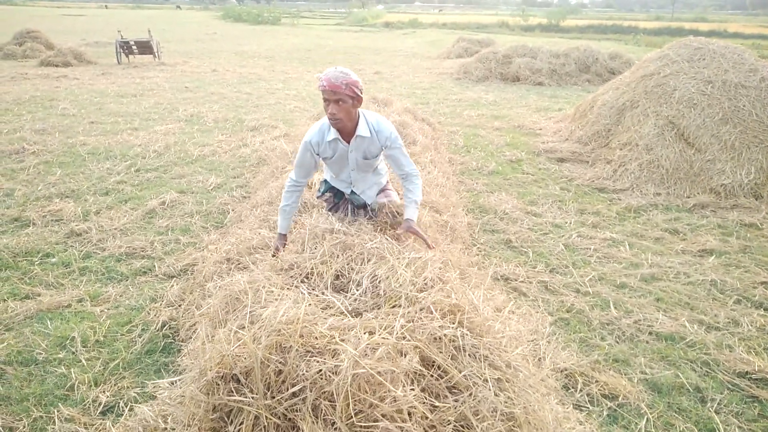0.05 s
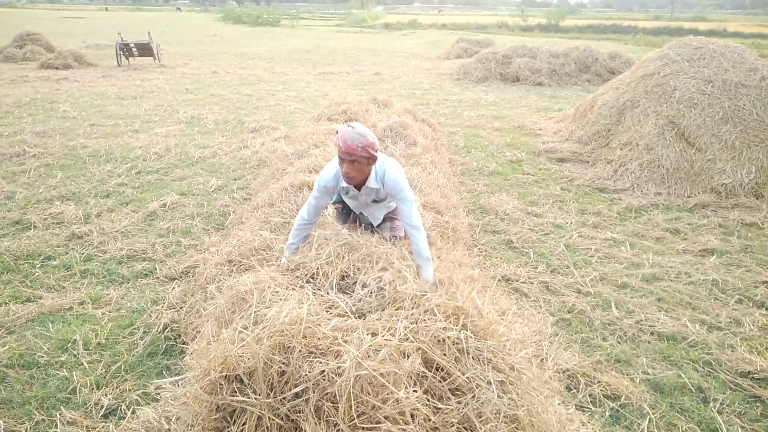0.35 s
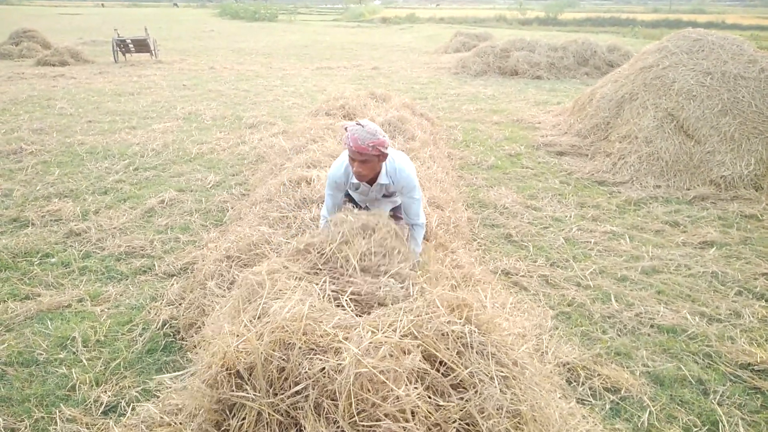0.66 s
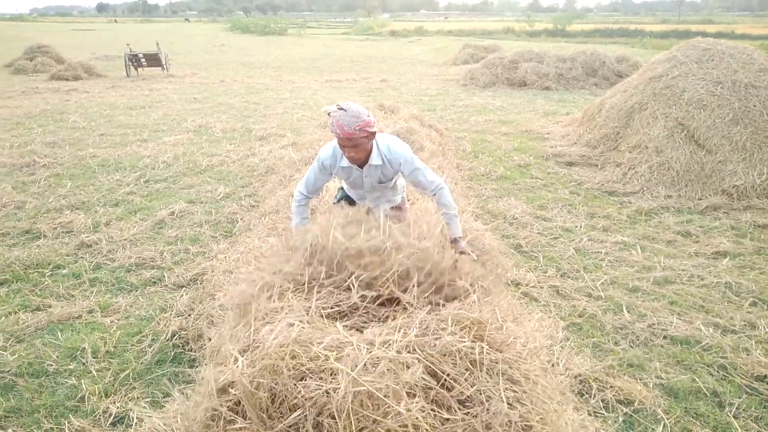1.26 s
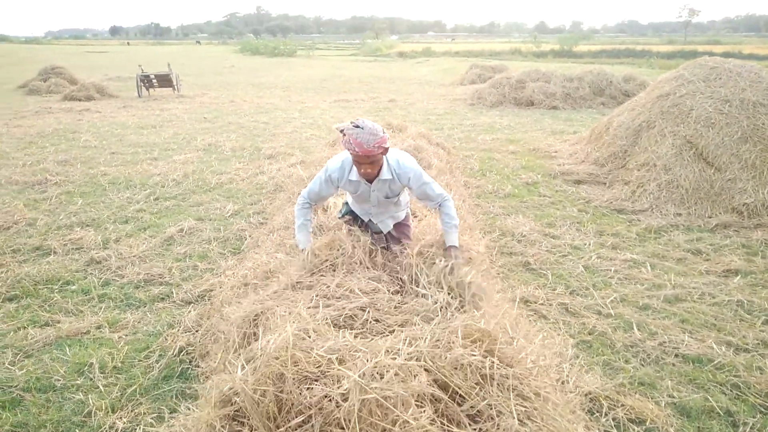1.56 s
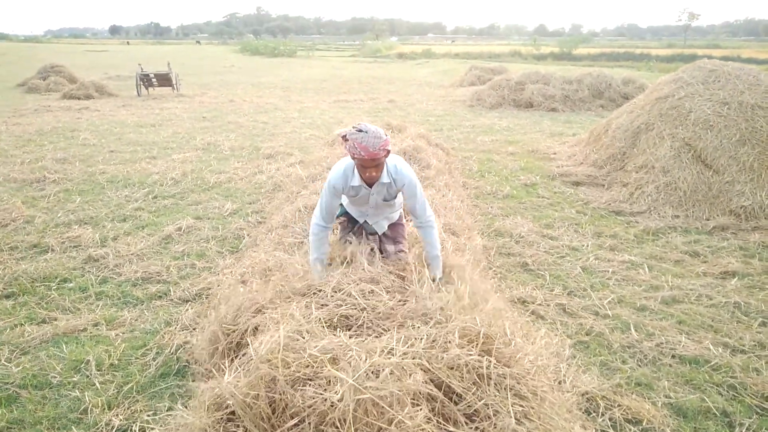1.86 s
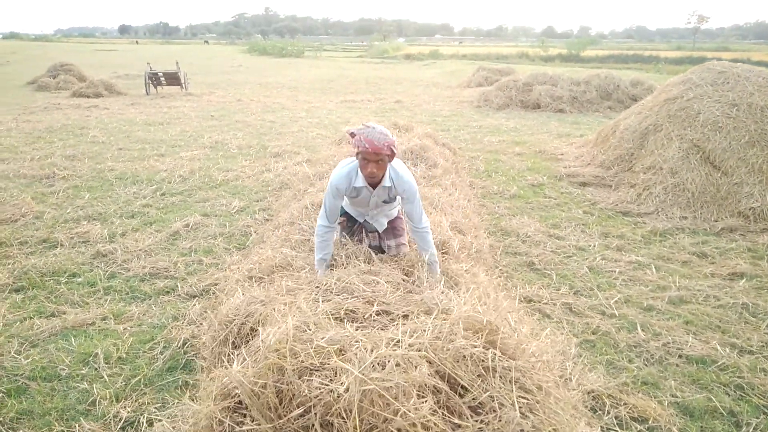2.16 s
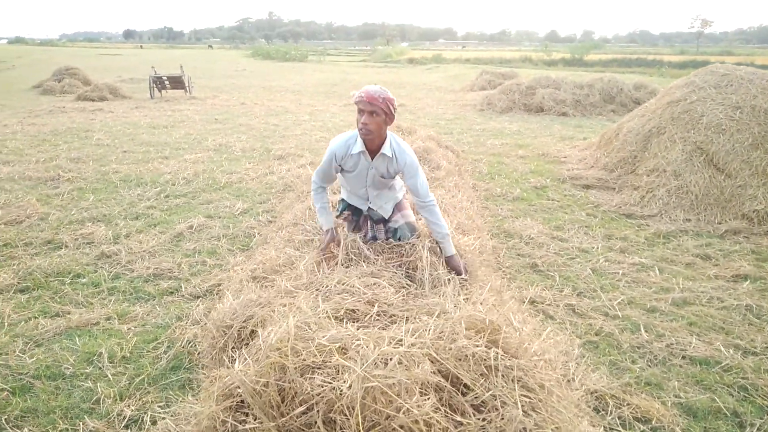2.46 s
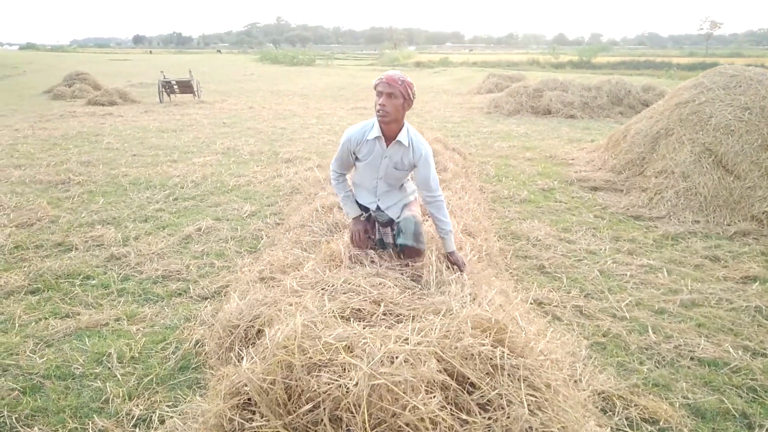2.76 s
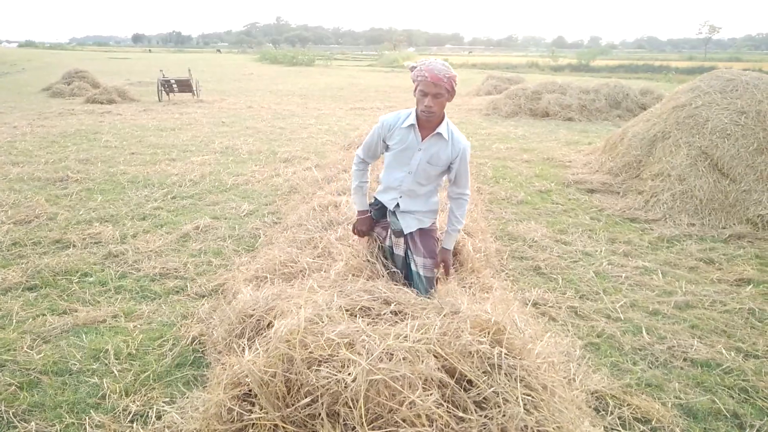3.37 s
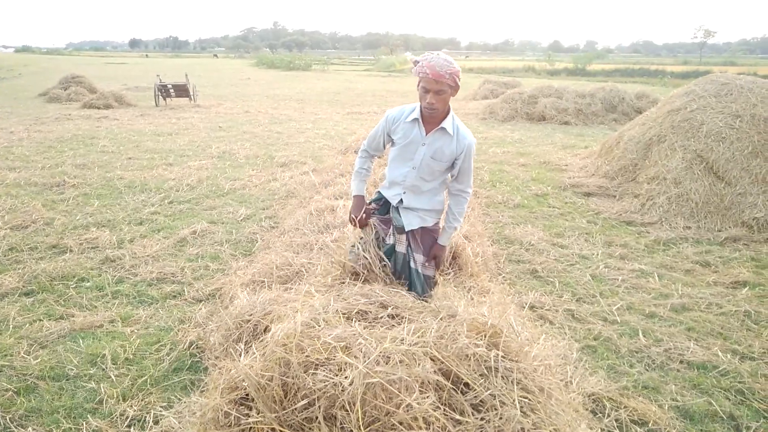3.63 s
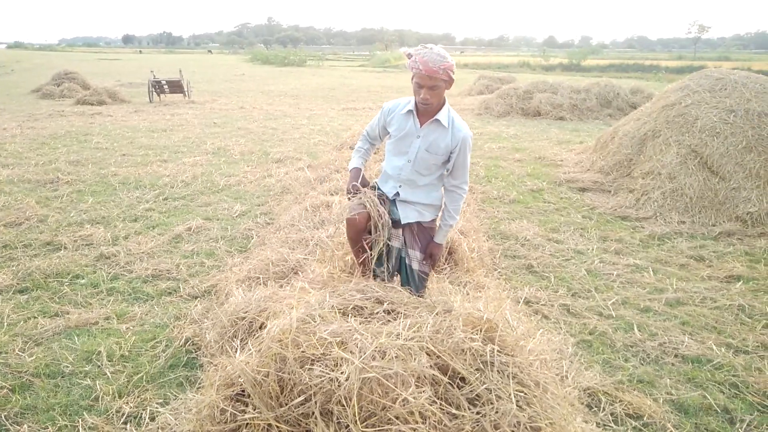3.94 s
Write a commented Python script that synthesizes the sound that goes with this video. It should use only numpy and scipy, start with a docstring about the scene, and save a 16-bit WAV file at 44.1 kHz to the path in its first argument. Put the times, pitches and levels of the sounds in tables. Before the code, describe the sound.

Armfuls of dry straw hiss and crackle under low gusts of wind on the microphone.

```python
"""Piling straw in the wind

Armfuls of dry straw are gathered, lifted and pressed onto a pile in an open field, a few metres
from a phone. Countless snapping stalks merge into a soft hiss over the duller rub of the bundle.
Gusts carry eddies past the microphone and buffet it, mostly its right port.
Early on something hard knocks close by; near the end a far bird peeps. There is no echo."""
import sys
import numpy as np
from scipy import signal
from scipy.fft import rfft, irfft
from scipy.io import wavfile
from scipy.ndimage import uniform_filter1d, map_coordinates

SR = 44100
rng = np.random.default_rng(int(sys.argv[2]) if len(sys.argv) > 2 else 0)


def wav_out(sig):
    """Save sig, one row per channel (or a flat mono array), as 16-bit PCM at SR to the path in sys.argv[1]."""
    wavfile.write(sys.argv[1], SR, np.round(np.clip(np.atleast_2d(sig).T, -1, 1) * 32767).astype(np.int16))


N = 176400


def undb(db):
    """Decibels to gain."""
    return 10 ** (np.asarray(db) / 20)


def unit_rms(x):
    """Scale to rms 1."""
    return x / np.sqrt(np.mean(x ** 2))


def colour(x, curve):
    """Zero-phase filter; curve rows: f/Hz, gain/dB."""
    hz, db = np.array(curve, float).T
    bins_hz = np.maximum(np.arange(N + 1) * SR / (2 * N), 1)
    gain = undb(np.interp(np.log(bins_hz), np.log(np.sort(hz)), db))
    return irfft(rfft(x, 2 * N) * gain)[..., :N]


def drift(rate_hz):
    """Smooth random drift, rms 1."""
    hold = max(int(SR / rate_hz), 2)
    steps = np.repeat(rng.standard_normal(N)[:N // hold + 1], hold)
    return unit_rms(uniform_filter1d(steps, hold)[:N])


def pan(left_minus_right_db):
    """Left and right gains, mean 1."""
    gains = undb([[left_minus_right_db / 2], [-left_minus_right_db / 2]])
    return gains / gains.mean()


def stereo(streams, common, spectrum):
    """Mix common, left and right streams into a coloured pair, rms 1."""
    return unit_rms(colour(colour(streams[0], common) + streams[1:], spectrum))


# Loudness of the handling: t/s, level/dB
HANDLING = [(0, -71.5), (.09, -74.5), (.16, -64), (.24, -56), (.38, -55.5), (.45, -58), (.58, -51.5),
            (.8, -52.5), (1, -54.5), (1.1, -60.5), (1.26, -51.5), (1.38, -51.5), (1.46, -56.5),
            (1.66, -58.5), (1.78, -61), (1.9, -56), (2.02, -62.5), (2.13, -73.5), (2.22, -71), (2.36, -64),
            (2.48, -65.5), (2.62, -73), (2.705, -75), (2.755, -62), (2.895, -55.5), (3, -60), (3.1, -68),
            (3.22, -61.5), (3.45, -63), (3.68, -68), (3.78, -75.5), (3.86, -75), (3.93, -68), (4, -68.5)]
# Spectra of snapping stalks and rubbing bundle: f/Hz, level/dB
SNAP_SPECTRUM = [(1500, -51.5), (2800, -22.5), (3500, -9.5), (4200, -2), (4900, 4), (6000, 1), (7000, -9.5),
                 (10000, -11)]
RUB_SPECTRUM = [(300, -9.5), (600, -7.5), (950, -2), (1300, 4.5), (1550, 1), (2100, 4), (2800, 1),
                (4000, 2), (8000, -44)]
# Sound common to both ports, relative to each port's own: f/Hz, level/dB
SNAP_COMMON = [(1000, 4), (2700, -9.5), (3200, 3), (3700, 3.5), (4300, 0.5), (5000, -7), (6000, -8.5),
               (8000, -1.5)]
NOISE_COMMON = [(300, -5.5), (900, 6), (1300, -4.5), (2500, -2), (3200, 3.5)]  # rub and field


def straw(t):
    """Dry stalks snap, denser with harder handling; the bundle's rub grows more slowly."""
    peak_snaps_per_s, flutter_db = 9000, 0.76
    rub_slope, rub_pivot_db = 0.86, -66
    level_db = np.interp(t, *np.array(HANDLING).T) + flutter_db * drift(rate_hz=35)
    snaps_per_s = peak_snaps_per_s * undb((level_db - level_db.max()) / 2)
    sizes = undb(2.5 * np.minimum(rng.exponential(size=(3, N)), 4))
    fired = rng.random((3, N)) < snaps_per_s / SR
    snaps = fired * sizes * rng.choice([-1, 1], (3, N)) / np.sqrt(snaps_per_s)
    crackle = stereo(snaps, SNAP_COMMON, SNAP_SPECTRUM)
    rub = stereo(rng.standard_normal((3, N)), NOISE_COMMON, RUB_SPECTRUM)
    rub_db = rub_pivot_db + rub_slope * (level_db - rub_pivot_db) - 10
    return crackle * undb(level_db + .5) * pan(-7) + rub * undb(rub_db) * pan(.5)


# Gusts at each port: t/s, length/s, level/dB, relative air speed
LEFT_GUSTS = [(.09, 0.022, -45.5, 0.91), (0.153, 0.0259, -42, 0.93), (0.247, 0.037, -41, 0.99),
              (0.322, 0.04, -46, 0.82), (0.362, 0.027, -41, 0.75), (0.526, 0.025, -36.5, 0.76),
              (0.799, 0.085, -51.5, 0.69), (0.939, 0.026, -48, 0.78), (1.14, 0.057, -48, 0.79),
              (1.464, 0.019, -51, 0.63), (1.82, 0.022, -43, 0.48), (1.94, 0.089, -53, 0.69),
              (2.501, 0.12, -62, 0.57), (2.67, .02, -56.5, 0.72)]
RIGHT_GUSTS = [(-.01, 0.02498, -27.5, 1.13), (0.162, 0.051, -33.5, 1.095), (0.316, 0.023, -41.5, 0.77),
               (0.348, 0.0312, -45.5, 0.87), (0.447, 0.071, -33.5, 0.82), (0.493, 0.0876, -30, .85),
               (0.584, 0.1313, -32.5, 0.84), (0.716, 0.08654, -31.5, 0.98), (0.804, 0.05, -28, 1.2),
               (1.016, 0.06, -49, 0.66), (1.124, 0.031, -33.5, 0.7), (1.151, 0.045, -33, 1.016),
               (1.197, 0.04507, -31, 1.02), (1.278, 0.056, -34.5, 1.16), (1.432, 0.024, -36, 0.83),
               (1.469, 0.061, -31.5, 0.85), (1.566, 0.08, -34, 0.73), (1.636, 0.17, -28, 0.87),
               (1.823, 0.06, -31, .9), (1.889, .025, -27.5, 1.12), (1.937, 0.09684, -32.5, 0.89),
               (2.041, 0.09285, -35.5, 0.75), (2.121, 0.0556, -32, 1.09), (2.225, 0.06, -31.5, 0.91),
               (2.318, 0.06684, -33, 0.91), (2.461, 0.0757, -36, 0.88), (2.593, 0.045, -38, 0.86),
               (2.642, .044, -28.5, 1.26), (2.823, 0.04653, -38.5, 0.84), (2.89, 0.03025, -41, 0.97),
               (3.026, 0.1006, -32, 0.92), (3.133, 0.0487, -28.5, 0.79), (3.194, 0.08204, -34, 0.66),
               (3.32, 0.05, -27.5, 0.97), (3.423, 0.099, -31.5, 0.69), (3.509, 0.016, -32.5, 0.65),
               (3.569, 0.18, -37.5, .68), (3.76, 0.082, -36, 0.63), (3.879, 0.13, -36.5, 0.56)]
# Eddy spectrum at speed 1: f/Hz, level/dB
EDDY_SPECTRUM = [(20, 2), (60, -3.5), (140, 3.5), (230, -4), (350, -14.5), (500, -22.5), (700, -35.5),
                 (1200, -73), (3000, -105)]
# Low cut on the eddy pressure; a port's response to wind: f/Hz, gain/dB
EDDY_LOW_CUT = [(15, -45.5), (30, -27.5), (45, -14.5), (65, 4), (90, -6)]
PORT_RESPONSE = [(15, -48.5), (30, -29), (45, -1), (65, -8), (90, 1.5), (620, 0.5), (800, -7.5), (1200, 8)]


def wind(t, gusts, breeze_db):
    """Eddies pass one port: faster air, shorter and brighter buffets. Slow eddies trail each gust."""
    attack_s, release_s, wake_s, wake_db = 0.00995, 0.026, 0.037, -12
    breeze_speed, speed_spread, buffet_db = .65, .16, 1.5
    power = undb(breeze_db + 2 * buffet_db * drift(rate_hz=10)) ** 2
    weighted_speed = power * breeze_speed
    for start_s, length_s, db, speed in gusts:
        age_s = t - start_s
        edge = np.minimum(age_s / attack_s, (length_s - age_s) / release_s)
        gust_power = undb(db) ** 2 * np.clip((edge + 1) / 2, 0, 1) ** 3
        wake = np.clip(age_s / length_s, 0, 1) * np.exp(-np.maximum(age_s - length_s, 0) / wake_s)
        wake_power = (undb(db + wake_db) * wake) ** 2
        power += gust_power + wake_power
        weighted_speed += gust_power * speed + wake_power * breeze_speed
    swirl = drift(rate_hz=170)
    travel = np.cumsum(weighted_speed / power * np.exp(speed_spread * swirl))
    eddies = colour(rng.standard_normal(N), EDDY_SPECTRUM)
    pressure = map_coordinates(eddies, [travel], mode="mirror")
    pressure = colour(pressure * undb(buffet_db * swirl), EDDY_LOW_CUT)
    window = int(0.021 * SR)  # levelling, so that a gust holds its strength
    local_power = uniform_filter1d(uniform_filter1d(pressure ** 2, window), window)
    fade_in = np.minimum(t / attack_s, 1)
    return colour(pressure * np.sqrt(power / local_power) * fade_in, PORT_RESPONSE)


# Single strong eddies: t/s, level/dB, f/Hz
STRONG_EDDIES = [(.007, -22, 131), (.512, -24.5, 122), (0.566, -22, 170), (0.721, -22, 195),
                 (0.765, -20, 168.6), (.777, -24.5, 247), (0.833, -18.5, 155), (1.161, -22, 131.3),
                 (1.303, -25, 212.4), (1.475, -24.5, 165), (1.513, -23, 179), (1.647, -24, 137.3),
                 (1.727, -21, 174.5), (1.847, -24.5, 176.2), (1.893, -21.5, 288.2), (2.004, -21, 138),
                 (2.134, -28.5, 213), (2.167, -21.5, 144.5), (2.207, -18, 137), (2.226, -27.5, 250),
                 (2.351, -20, 189.4), (2.369, -21.5, 164), (2.642, -21, 165.5), (2.657, -21.5, 193.5),
                 (2.67, -21, 227), (2.904, -29.5, 230), (3.009, -23, 215.7), (3.035, -18, 169),
                 (3.131, -24, 173), (3.148, -20.5, 130)]


def thumps(t):
    """Each strong eddy is one swing of pressure; the smaller the eddy, the higher its pitch."""
    pressure = np.zeros(N)
    for centre_s, db, hz in STRONG_EDDIES:
        pulse = 1 / (1 - 2j * np.pi * hz * (t - centre_s) / 3) ** 4  # spectrum peaks at hz
        rotation = np.exp(2j * np.pi * rng.random())
        pressure += undb(db) * (rotation * pulse).real
    return colour(pressure, PORT_RESPONSE)


# Blows on the object: t/s, level/dB, treble/dB
BLOWS = [(0.1917, -20.5, -2.5), (.222, -33, -16), (0.367, -33.5, -19.5), (.392, -39, -29),
         (.454, -40.5, -32.5), (.501, -40.5, -25), (.512, -35.5, -28)]
# Contacts within a blow: delay/s, level/dB
CONTACTS = [(0, -0.5), (.0038, -5.5), (.0095, -1)]
# Modes of the object before damping: f/Hz, level/dB, t60/s
MODES = [(480, -16, .18), (788, -2, .21), (1006, -2, .16), (1130, -4, .13), (1215, 0, .11), (1354, -4, .13),
         (1497, -10, .1), (1592, -8, .11), (1767, -11, .11), (1888, -11, .11), (1987, -8, .11),
         (2110, -8, .12), (2296, 6.5, .045), (2549, -6, .11), (2660, 2, .07)]
# Contact noise: f/Hz, level/dB
CRACK_SPECTRUM = [(200, -13.5), (550, -7), (780, 5), (1100, 6), (1500, -1), (1950, 6.5), (2330, -1.5),
                  (2700, -8.5), (3100, -18), (4000, -9), (4700, -5.5), (5600, -9.5), (7000, -31),
                  (10000, -31)]
# Left port relative to right: f/Hz, gain/dB
KNOCK_LEFT_EQ = [(400, -2.5), (2700, -13.5), (3300, 6), (4700, -1.5), (6500, 6.5)]


def knocks(t):
    """A small hard object chatters, rings and is soon damped. Softer knocks are duller."""
    contact_s, damping_s, crack_t60_s, right_lag_s = 0.0019, .052, .055, .00043
    out = np.zeros(N)
    for start_s, db, treble_db in BLOWS:
        age_s = np.maximum(t - start_s, 0)
        ring = sum(undb(mode_db - 60 * age_s / t60_s) * np.sin(2 * np.pi * (hz * age_s + rng.random()))
                   for hz, mode_db, t60_s in MODES)
        ring *= np.minimum(age_s / contact_s, 1) * np.exp(-(age_s / damping_s) ** 2)
        crack_power = np.zeros(N)
        for delay_s, contact_db in CONTACTS:
            decay_db = 60 * np.maximum(age_s - delay_s, 0) / crack_t60_s
            crack_power += (t > start_s + delay_s) * undb(contact_db - decay_db) ** 2
        crack = unit_rms(colour(rng.standard_normal(N), CRACK_SPECTRUM)) * np.sqrt(crack_power)
        hit = undb(db - 6.5) * ring + undb(db - 2.5) * crack
        out += colour(hit, [(700, 0), (6000, treble_db)])
    return np.array([colour(out, KNOCK_LEFT_EQ), np.interp(t - right_lag_s, t, out)])


# Peeps: t/s, length/s, start f/Hz, end f/Hz, level/dB
BIRD_PEEPS = [(3.478, 0.034, 2960, 2910, -67), (3.52, 0.033, 3648, 3770, -64.5),
              (3.972, 0.032, 2533, 2300, -74)]


def bird(t):
    """Faint gliding peeps from far off, wavering in the moving air."""
    out = np.zeros(N)
    waver = 1 + .025 * drift(rate_hz=500)
    for start_s, length_s, from_hz, to_hz, db in BIRD_PEEPS:
        progress = np.clip((t - start_s) / length_s, 0, 1)
        pitch_hz = waver * (from_hz + (to_hz - from_hz) * progress)
        out += undb(db) * np.sin(np.pi * progress) * np.sin(2 * np.pi * np.cumsum(pitch_hz) / SR)
    return out * undb(3 * drift(rate_hz=150)) * pan(-5)


# Quiet field: f/Hz, level/dB
FIELD_SPECTRUM = [(40, 8), (120, 1), (350, 6), (650, 4), (790, -4.5), (950, 4), (1600, -18.5),
                  (3000, -18.5), (6000, -9), (10000, -20.5)]


def field():
    """Low murmur of air over open ground."""
    return stereo(rng.standard_normal((3, N)), NOISE_COMMON, FIELD_SPECTRUM) * undb(-77.5)


def scene():
    """Straw, wind on each port, knocks, bird and field."""
    t = np.arange(N) / SR
    left_wind = wind(t, LEFT_GUSTS, breeze_db=-68.5)
    right_wind = wind(t, RIGHT_GUSTS, breeze_db=-60) + thumps(t)
    return straw(t) + np.array([left_wind, right_wind]) + knocks(t) + bird(t) + field()


# Microphone response: f/Hz, gain/dB
MIC_RESPONSE = [(6800, 1.5), (7350, -5.5), (7700, -17), (8000, -37), (8500, -17), (9300, -14.5),
                (10000, -32.5)]


def record(dry):
    """The phone dulls the treble and cuts the top."""
    cutoff_hz = 9800
    lowpass = signal.ellip(8, .2, 70, cutoff_hz, fs=SR, output="sos")
    return signal.sosfilt(lowpass, colour(dry, MIC_RESPONSE))


dry = scene()
out = record(dry)
wav_out(out)
```